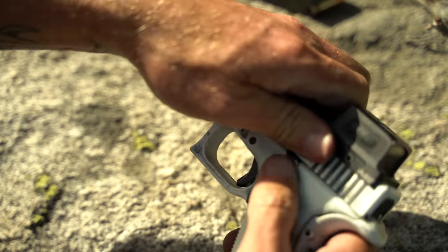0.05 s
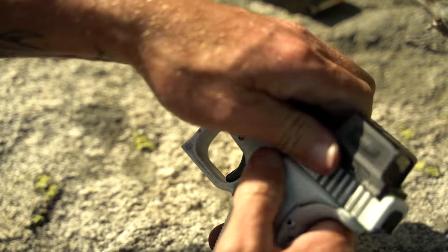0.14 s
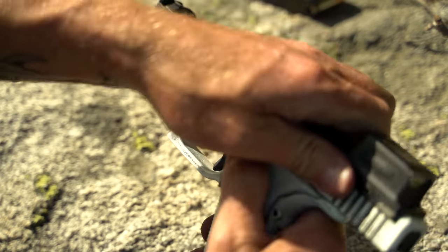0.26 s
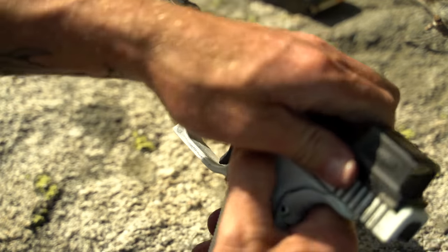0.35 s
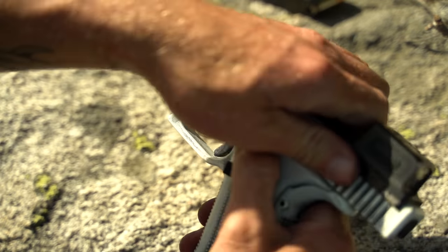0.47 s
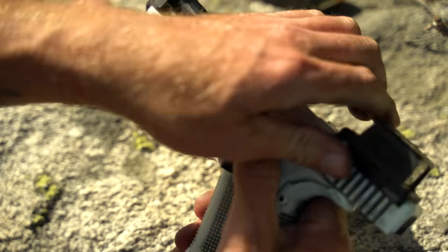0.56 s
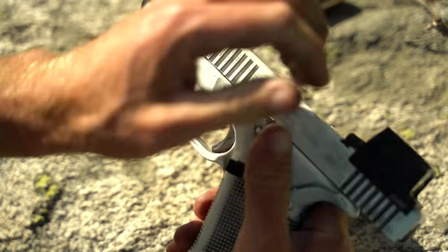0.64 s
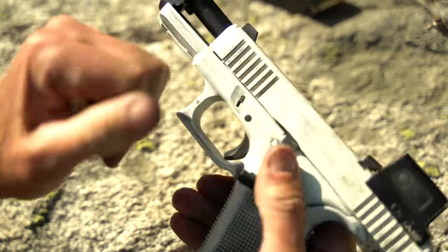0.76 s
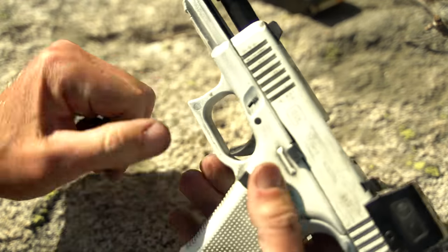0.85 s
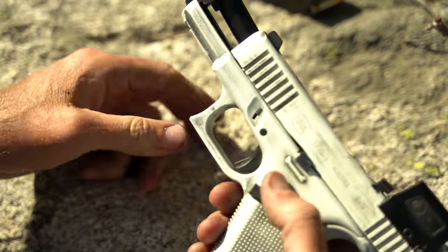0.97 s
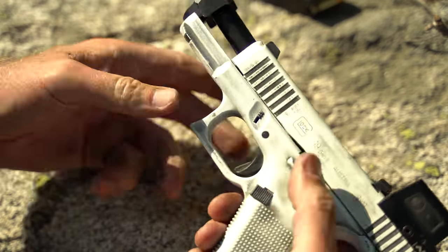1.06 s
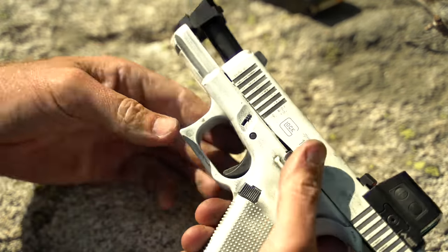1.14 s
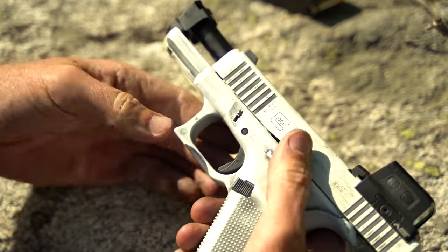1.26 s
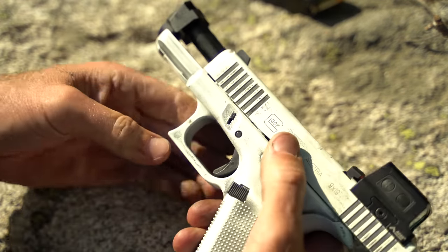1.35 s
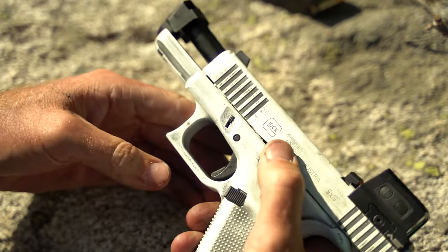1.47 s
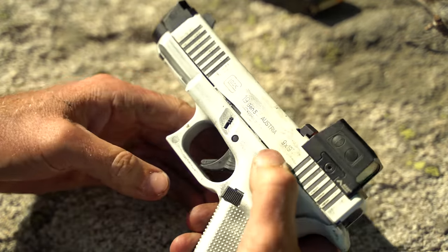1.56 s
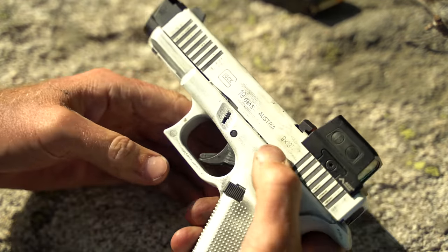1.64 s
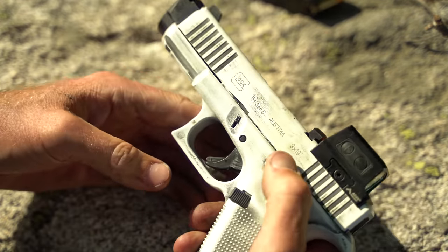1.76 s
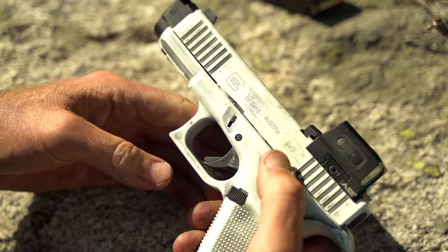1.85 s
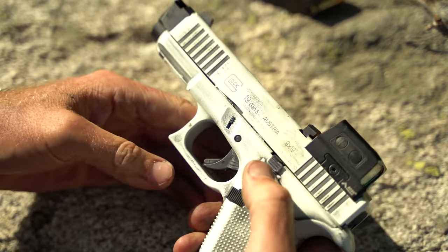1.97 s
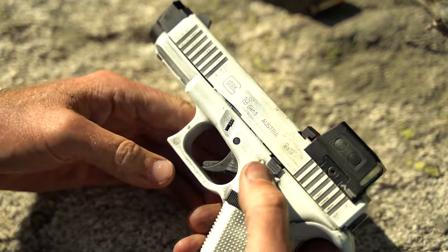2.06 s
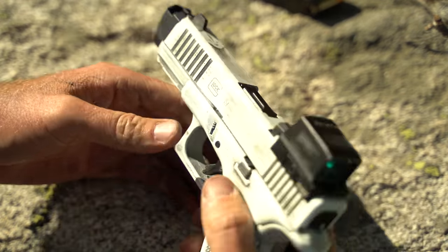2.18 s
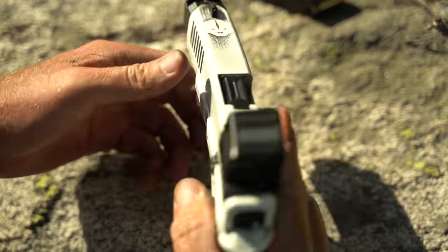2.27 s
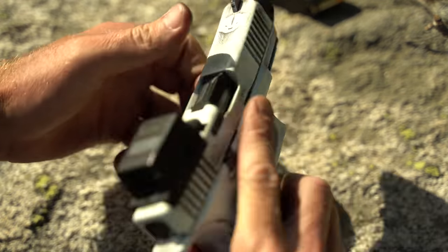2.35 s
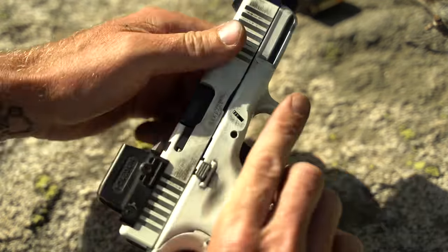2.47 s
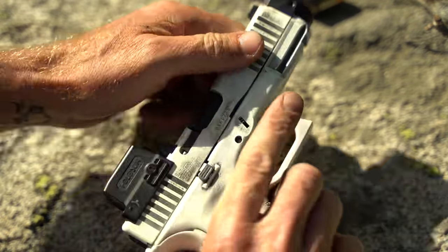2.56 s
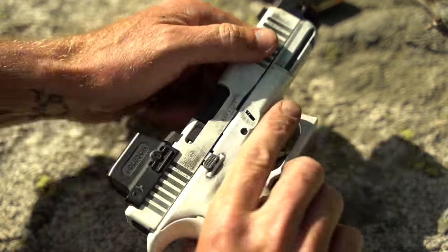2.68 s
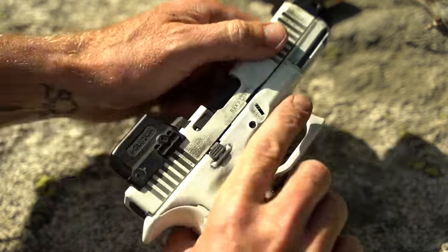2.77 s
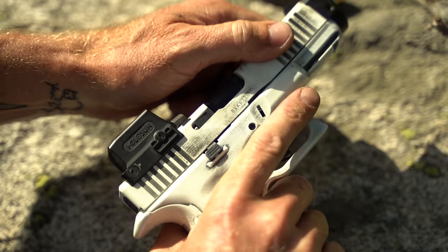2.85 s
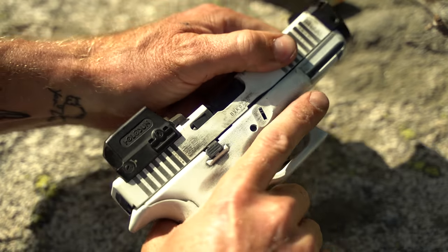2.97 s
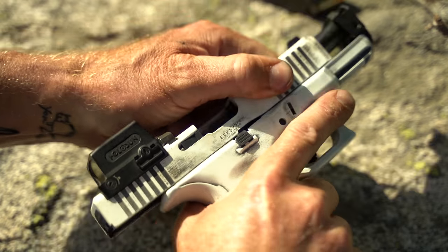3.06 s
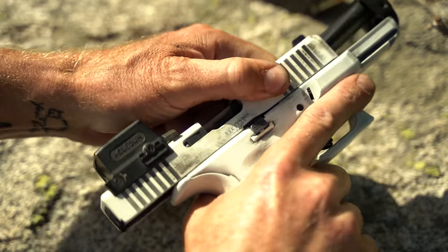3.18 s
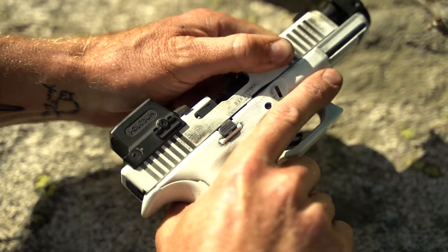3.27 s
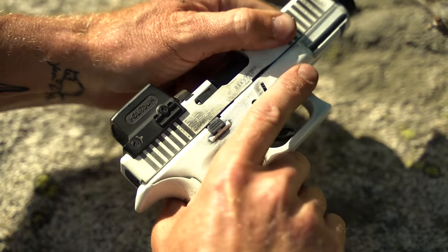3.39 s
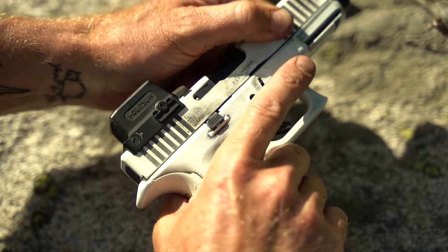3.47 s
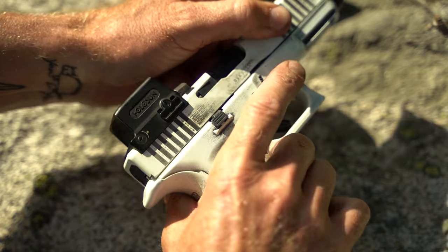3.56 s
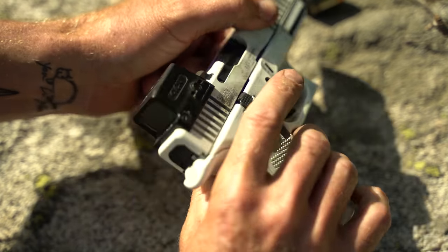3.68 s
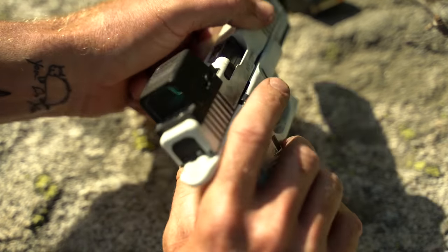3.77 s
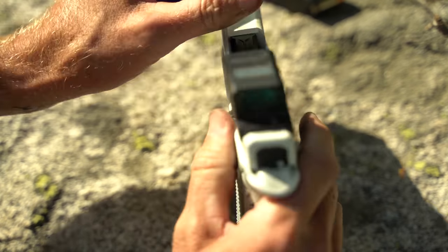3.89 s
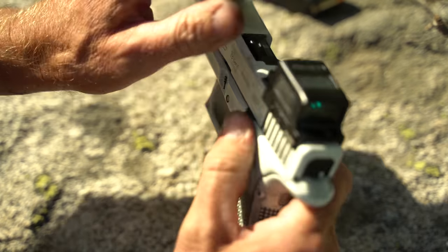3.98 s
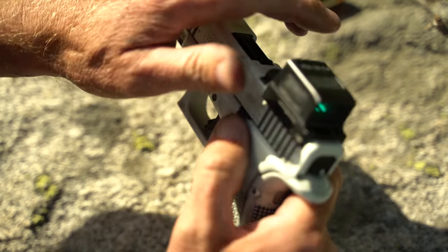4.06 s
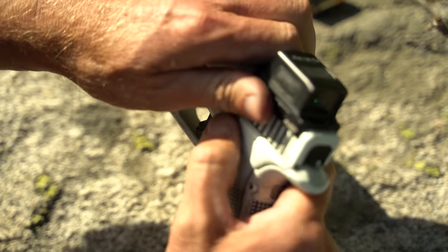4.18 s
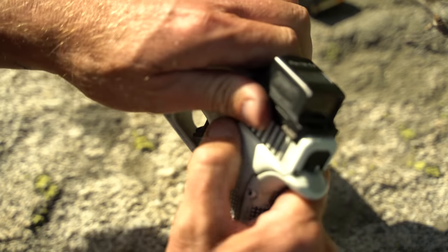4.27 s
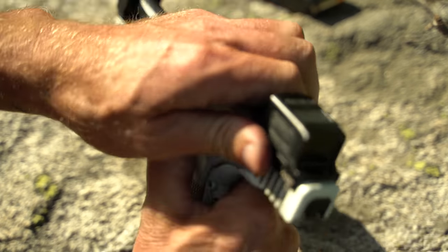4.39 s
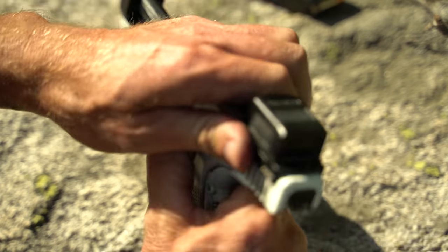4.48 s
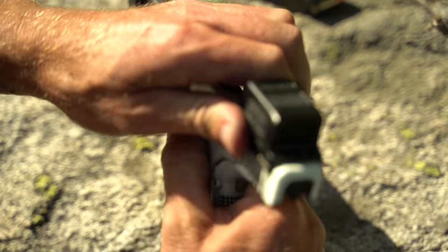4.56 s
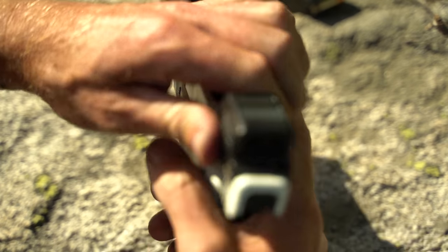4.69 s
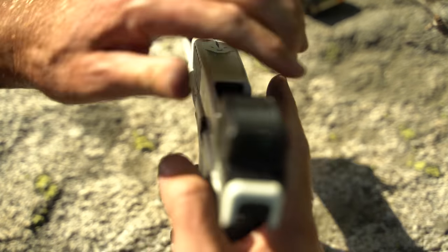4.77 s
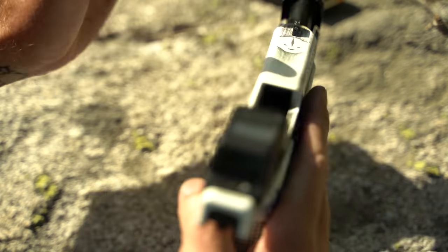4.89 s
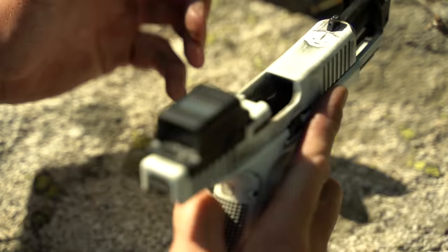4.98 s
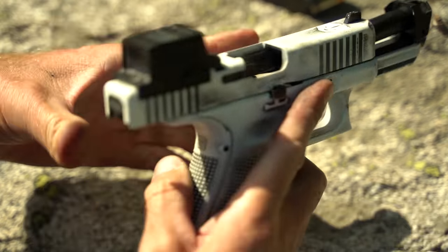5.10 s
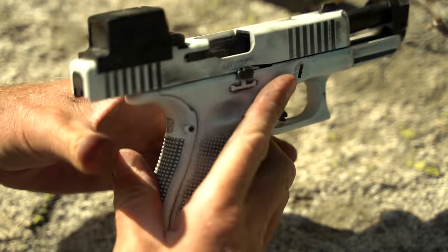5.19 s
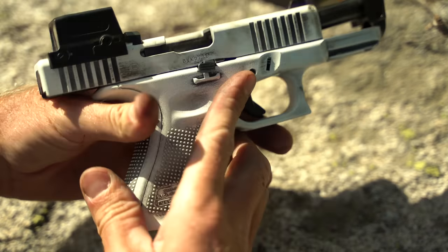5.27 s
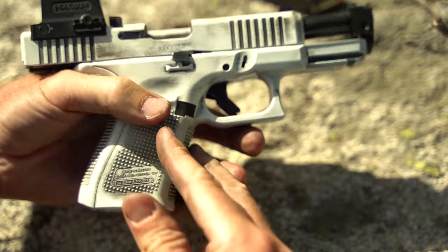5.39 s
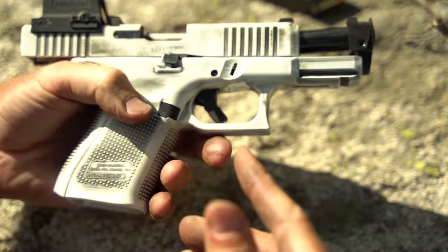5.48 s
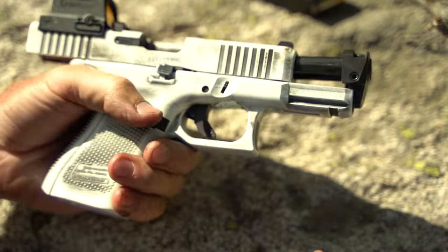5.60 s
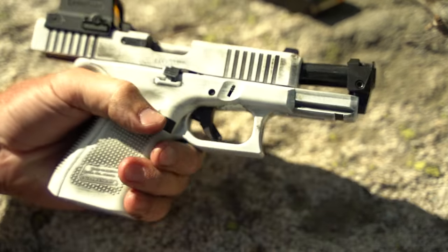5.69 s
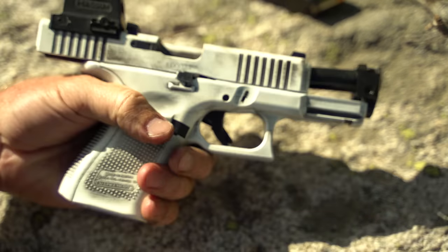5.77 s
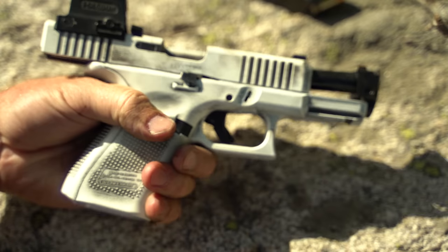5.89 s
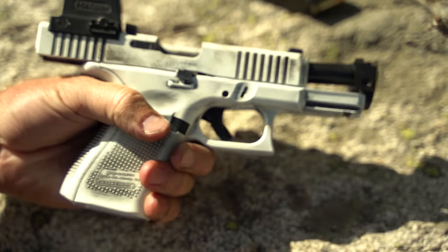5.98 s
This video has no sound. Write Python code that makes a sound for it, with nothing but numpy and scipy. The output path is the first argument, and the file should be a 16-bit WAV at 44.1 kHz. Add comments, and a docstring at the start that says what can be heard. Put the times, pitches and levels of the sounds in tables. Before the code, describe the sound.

A pistol is put back together by hand, close to the microphone outdoors. The steel slide scrapes briefly and clacks twice, then slams shut with one sharp, ringing snap. Two more quick pairs of scrapes and clacks follow, with soft rubbing of palms on the gun between them. A few small ticks finish it, over quiet air and a very faint distant hum.

```python
"""A pistol is put back together and racked by hand, close up, above a flat rock outdoors.
Its steel slide sticks and slips along the rails, knocks against its stops and once slams shut on its
spring. Each stop rings the steel and jolts the hands; lugs, catches and levers click into place.
Palms slip over the metal between strokes, and rock, ground and body throw back a short tail.
The air is quiet, with a faint far hum rising towards the end."""
import sys
import numpy as np
from scipy import signal
from scipy.io import wavfile

SR = 44100
rng = np.random.default_rng(int(sys.argv[2]) if len(sys.argv) > 2 else 0)


def pcm_store(signal):
    """Save signal as 16-bit PCM."""
    levels = np.round(np.clip(np.atleast_2d(signal), -1, 1) * 32767)
    wavfile.write(sys.argv[1], SR, levels.astype(np.int16).T)


N = 266364
TIME = np.arange(N) / SR

# Stereo image: (frequency [Hz], left-right correlation [0..1])
LIKENESS = [(60, .85), (130, .7), (300, .92), (700, .95), (1400, .65), (2500, .35), (5000, .25),
            (14000, .1)]
# Where the gun's modes crowd, a row each for thud, knock, clack, crack and top: (low [Hz], high [Hz])
MODE_BANDS = [(235, 780), (780, 1400), (1780, 3000), (3900, 9200), (9200, 15800)]
# The slide hits the end of its travel: (time [s], clack [dB], frame re clack [dB], crack re clack [dB],
# frame mode [Hz], slide mode [Hz], jolt [dB], rebound delay [s], rebound loss [dB])
SLIDE_STOPS = [(0.3108, -29.5, -3.5, -12.5, 648, 2190, -41, 0.034, 17),
               (0.4924, -19, -4.5, -11, 813, 2597, -49.5, .0225, 18),
               (1.6437, -11, -7.5, 3.5, 1085, 2367, -31, .025, 31),
               (3.2064, -29, 4.5, -4, 1240, 2570, -45, 0.046, 25.5),
               (3.4065, -24.5, -4, 4.5, 1177, 2500, -56, 0.015, 0.5),
               (4.5149, -21, -6, -9, 684, 1886, -39.5, .028, 16.5),
               (4.626, -22.5, -5, -6, 665, 1875, -48, 0.016, 15.5)]


def from_db(db):
    """Decibels to gain."""
    return 10 ** (np.asarray(db) / 20)


def rms_one(x):
    """Scale to unit rms."""
    return x / np.sqrt(np.mean(x ** 2) + 1e-30)


def decay(t, t60):
    """A fade that loses 60 dB in t60 seconds."""
    return np.exp(-np.log(1000) * t / t60)


def at_hz(points, hz):
    """Read a curve on a log-frequency axis."""
    f, value = np.transpose(points)
    return np.interp(np.log(hz), np.log(f), value)


def add(track, sound, s):
    """Mix a stereo sound into the track at s seconds."""
    start = int(s * SR)
    track[:, start:start + sound.shape[1]] += sound[:, :N - start]


def band(x, low, high, order=3):
    """Causal band-pass."""
    sos = signal.butter(order, [low, min(high, .45 * SR)], "band", fs=SR, output="sos")
    return signal.sosfilt(sos, x)


def resonance(x, hz, width_hz):
    """Two-pole resonance with unit gain at its peak."""
    r = np.exp(-np.pi * width_hz / SR)
    feedback = [1, -2 * r * np.cos(2 * np.pi * hz / SR), r * r]
    return signal.lfilter(np.array([1, 0, -1]) * (1 - r * r) / 2, feedback, x)


def stereo_noise(hz, size):
    """White noise with the stereo width and balance that belong to this pitch."""
    # Pan by pitch: (frequency [Hz], left minus right [dB])
    balance = [(50, 4.5), (130, 5.5), (260, 1.7), (550, -1.3), (1100, -2.6), (2300, -.8), (5000, 2.3),
               (12000, .3)]
    mid, side = rng.standard_normal((2, size))
    alike, sides = at_hz(LIKENESS, hz), np.array([[1], [-1]])
    pair = np.sqrt(1 + alike) * mid + np.sqrt(1 - alike) * side * sides
    return pair * from_db(sides * at_hz(balance, hz) / 2)


def drift(per_s):
    """A random wander of unit rms, with per_s new values a second."""
    knots = rng.standard_normal(int(per_s * N / SR) + 2)
    return rms_one(np.interp(TIME * per_s, np.arange(len(knots)), knots))


def coloured(spectrum, drive=1):
    """Stereo noise, shaped in time by a drive, then coloured in half-octave bands; unit rms."""
    edges = np.geomspace(18, 17000, 21)
    centres = np.sqrt(edges[:-1] * edges[1:])
    return rms_one(sum(from_db(at_hz(spectrum, hz)) * band(stereo_noise(hz, N) * drive, low, high, 2)
                       for low, high, hz in zip(edges, edges[1:], centres)))


def outdoor_air(level_db=-64, sway_db=2.76, sways_per_s=2.8):
    """A quiet bed of gently swaying air."""
    # Colour of the air: (frequency [Hz], spectral density [dB])
    air_colour = [(12, -33), (20, 0.5), (49, -2.5), (85, -3), (119, -10.5), (268, -12.5), (386, -8),
                  (469, -14.5), (713, -13.5), (1280, -23.5), (1510, -32), (1650, -25), (4140, -34),
                  (6290, -34), (15800, -39)]
    return from_db(level_db - sway_db * drift(sways_per_s)) * coloured(air_colour)


def swell(s, db, length_s, taper=4.6):
    """Gain of a hand movement that gathers speed, peaks at s seconds and slows again."""
    return from_db(db) / (1 + ((TIME - s) / length_s) ** 2) ** taper


def skin_slips(hold_db=-84.5, rough_db=1.44, grains_per_s=260):
    """Dry skin slides over grip and serrations, barely heard while the gun is only held."""
    # The hands change grip: (time of greatest speed [s], level [dB], length [s])
    regrips = [(0.132, -76, 0.41), (0.9, -66, 0.094), (1.089, -73.5, 0.18), (2.586, -62.5, 0.19),
               (3.675, -72, .09), (3.86, -73.5, .1), (4.19, -59, 0.16), (4.702, -66, .1),
               (4.934, -59.5, 0.18), (5.123, -63, 0.11), (5.43, -68, .18), (5.68, -71, 0.16)]
    # Colour of slipping skin: (frequency [Hz], spectral density [dB])
    skin_colour = [(300, -2), (1000, 3.5), (2200, 2), (3400, -10.5), (5000, -2), (7500, -6), (11000, -7.5),
                   (15500, -18)]
    slipping = from_db(hold_db) + sum(swell(*regrip) for regrip in regrips)
    grain = from_db(rough_db * drift(grains_per_s))
    return slipping * coloured(skin_colour, grain)


def steel_ring(level_db=-1):
    """The steel's bright modes ring on after a blow, each with a random phase on either side."""
    # Modes of the steel parts: (frequency [Hz], relative level [dB], t60 [s])
    steel_modes = [(1920, -21, 0.078), (2700, -23.5, .05), (4100, -27, .1), (4767, -21.5, 0.072),
                   (5500, -9, 0.063), (6140, -33, 0.18), (7537, -8.5, 0.011), (11810, -28, .07)]
    t = TIME[:SR // 5]
    phases = rng.standard_normal((len(steel_modes), 2, 1))
    return sum(from_db(db + level_db) * decay(t, t60) * np.sin(2 * np.pi * hz * t + phase)
               for (hz, db, t60), phase in zip(steel_modes, phases))


def contact(levels_db, frame_hz, slide_hz, t60, onset_s=.0012, dwell_s=.0011, again_db=-8.5):
    """The body of a blow: crowded, hand-damped modes, with a frame and a slide mode standing out."""
    t = TIME[:SR // 10]
    again_s = .0025 * rng.uniform(.9, 1.1)

    def envelope(decay_s):
        """The first touch fades, and a quieter copy of it follows a few milliseconds later."""
        first = (1 - np.exp(-t / onset_s)) * decay(np.maximum(t - dwell_s, 0), decay_s)
        return np.hypot(first, from_db(again_db) * np.interp(t - again_s, t, first, left=0))

    out = 0
    for part, (low, high), db in zip(("thud", "knock", "clack", "crack", "top"), MODE_BANDS, levels_db):
        crowd = stereo_noise(np.sqrt(low * high), len(t)) * envelope(t60)
        if part == "thud":
            crowd = np.diff(crowd, prepend=0)   # so small a body radiates its bass poorly
        if part == "clack":
            high = max(1.314 * slide_hz, low * 1.2)   # a palm that lowers the ring damps the modes above
            db -= .088 * np.clip(-25 - db, 0, 30)   # light touches wake less of the crowd
        if part == "top":
            crowd = signal.lfilter([1, 2, 1], [1], crowd)   # the top rolls away
        out = out + from_db(db) * rms_one(band(crowd, low, high))
    thud_db, knock_db, clack_db = levels_db[:3]
    frame_db = thud_db if frame_hz < MODE_BANDS[0][1] else knock_db
    for hz, db in [(frame_hz, frame_db - 3), (slide_hz, clack_db - 4.5)]:
        # the wider the image at this pitch, the further apart the left and right phases
        phases = np.arccos(at_hz(LIKENESS, hz)) * rng.choice([-1, 1]) * np.array([[.5], [-.5]])
        mode = envelope(1.1 * t60) * np.sin(2 * np.pi * hz * t + phases)
        out = out + from_db(db) * rms_one(mode)
    return out / np.sqrt(10)   # a level is the blow's energy spread over a hundredth of a second


def blow(s, clack_db, frame_db, crack_db, frame_hz, slide_hz, held_t60=.02, free_t60=.024):
    """One hit: the frame gives thud and knock, the slide the clack, hard steel edges crack and top."""
    # No palm damps the slide: (start [s], end [s])
    slide_free = [(.7, 2.4), (5.0, 6.1)]
    t60 = free_t60 if any(start < s < end for start, end in slide_free) else held_t60
    centres = np.sqrt(np.prod(MODE_BANDS[:2], axis=1))
    # the frame's modes weaken by 6.5 dB an octave away from the one struck
    thud_db, knock_db = frame_db - 6.5 * np.abs(np.log2(centres / frame_hz))
    # a palm that pulls the slide's ring below its usual 2200 Hz also dulls the top
    top_db = crack_db - 8 + 15 * np.log2(slide_hz / 2200)
    levels_db = clack_db + np.array([thud_db, knock_db, 0, crack_db, top_db])
    out = from_db(clack_db + crack_db) * steel_ring()
    add(out, contact(levels_db, frame_hz, slide_hz, t60), 0)
    return out


def clicks_and_stops():
    """Small parts click home; the slide hits its stops and rebounds once from each."""
    # Barrel lugs, catches and levers: (time [s], clack [dB], frame re clack [dB], crack re clack [dB],
    # frame mode [Hz], slide mode [Hz])
    clicks = [(0.2399, -23.5, -10, -4.5, 1096, 2856), (0.273, -28, -9, -7.5, 1200, 2500),
              (0.2974, -28.5, -14, -16, 1180, 2080), (0.952, -49, -4.5, -15, 1100, 2150),
              (1.203, -62, -7.5, -6.5, 477, 2750), (1.273, -68.5, 7, -12, 1067, 1960),
              (1.6247, -20.5, -2.5, -1.5, 1293, 2290), (1.641, -26, -7, -0.5, 1015, 2580),
              (2.2014, -65, 6, -2.5, 707, 2620), (3.084, -50, -3.5, -10, 1250, 2300),
              (3.1019, -51, -6, -4, 1147, 2246), (3.113, -40.5, -1.5, -5, 1288, 2370),
              (3.123, -38.5, 3, 2.5, 1100, 2620), (3.187, -42.5, -1, 7, 1010, 2000),
              (3.298, -56.5, 1, -19, 1033, 2680), (3.3116, -56.5, 2.5, -15, 1026, 2630),
              (3.3539, -45, -4, 0.5, 1000, 2400), (3.3765, -42, -0.5, -8, 1320, 2514),
              (3.4017, -38.5, -18, -3, 1080, 2400), (3.484, -62.5, 8.5, -7, 1350, 1890),
              (4.4393, -41.5, -13, -3.5, 1190, 1954), (4.454, -33.5, -13, -1.5, 1320, 2090),
              (4.4585, -27.5, -3.5, -0.5, 1184, 1930), (4.5, -30, -16, -1.5, 894, 2070),
              (5.353, -53, -9.5, -18, 918, 2200), (5.3786, -39.5, -10, -13, 1039, 2162),
              (5.626, -50.5, -7, -16.5, 932, 2075), (5.753, -62.5, 5, -18, 390.7, 2300),
              (5.8419, -51.5, 12, 0, 380, 1860), (5.955, -64.5, 1, -16.5, 1390, 2260)]
    # A rebound's soft touch rings the slide's lowest mode:
    # (frame re clack [dB], crack re clack [dB], frame mode [Hz], slide mode [Hz])
    rebound_colour = (-10.5, -11.5, 1200.5, 1880)
    out, hits = np.zeros((2, N)), list(clicks)
    for s, clack_db, *colour, _, rebound_s, loss_db in SLIDE_STOPS:
        hits.append((s, clack_db, *colour))
        hits.append((s + rebound_s, clack_db - loss_db, *rebound_colour))
    for s, *strike in hits:
        add(out, blow(s, *strike), s)
    return out


def reflections(gun, wet_db=-26, onset_s=.008, low_t60=.15, high_t60=.097):
    """Rock, ground and body throw back a short diffuse tail, whose treble dies first."""
    t = TIME[:SR // 4]
    tail, edges = 0, np.geomspace(400, 14000, 7)
    for low, high, t60 in zip(edges, edges[1:], np.linspace(low_t60, high_t60, len(edges) - 1)):
        shape = np.clip(t / onset_s, 0, 1) ** 2 * decay(t, t60)
        tail = tail + band(stereo_noise(np.sqrt(low * high), len(t)) * shape, low, high)
    return from_db(wet_db) * signal.fftconvolve(gun, rms_one(tail) / np.sqrt(len(t)), axes=1)[:, :N]


def stroke(start, end, start_db, end_db, rise_db_per_s=949.5, fall_db_per_s=748.5):
    """Gain of one run of the slide: a quick rise, a steady change of speed, a quick fall."""
    fade_db = rise_db_per_s * np.maximum(start - TIME, 0) + fall_db_per_s * np.maximum(TIME - end, 0)
    return from_db(np.interp(TIME, [start, end], [start_db, end_db]) - np.minimum(fade_db, 200))


def rail_scrape(rough_db=3.5, slips_per_s=420, slide_db=-1):
    """Steel sticks and slips along the rails; slide and spring ring with it."""
    # Runs of the slide: (start [s], end [s], friction at start [dB], friction at end [dB])
    strokes = [(0.252, 0.311, -39.5, -30), (0.472, 0.501, -53.5, -34.5), (3.117, 3.216, -48.5, -35.5),
               (3.339, 3.393, -49.5, -34.5), (4.456, 4.528, -39, -29.5), (4.633, 4.646, -31, -34)]
    # Colour of the rail friction: (frequency [Hz], spectral density [dB])
    friction_colour = [(200, -22.5), (500, 0), (1000, 6.5), (1500, 8.5), (2250, 7.5), (3000, 12.5),
                       (4000, -1), (6500, -2), (10000, -10.5), (15000, -22.5)]
    stick_slip = from_db(rough_db * np.clip(drift(slips_per_s), -2, 2))
    friction = sum(stroke(*row) for row in strokes) * coloured(friction_colour, stick_slip)
    slide = from_db(slide_db) * resonance(friction, hz=2200, width_hz=450)
    spring = resonance(friction, hz=6100, width_hz=300)
    return (friction + slide + spring) / (1 + from_db(slide_db))   # unit gain at the slide's resonance


def hand_jolts(usual_db=-48.5):
    """When the slide stops, the hands answer with a slap, a short thump and a fading tremor."""
    # Slap, thump and tremor: (low [Hz], high [Hz], relative level [dB], t60 [s],
    # response to the jolt's strength [dB per dB])
    hand_bands = [(156, 330, -6.5, .03, 1.3), (45.3, 140, 4.5, .035, 1), (23.83, 58, -1.5, .33, .4)]
    t, out = TIME[:SR // 2], np.zeros((2, N))
    for s, *_, jolt_db, _, _ in SLIDE_STOPS:
        for low, high, part_db, t60, response in hand_bands:
            fade = decay(t, t60)
            burst = band(stereo_noise(np.sqrt(low * high), len(t)) * fade, low, high, order=2)
            db = usual_db + response * (jolt_db - usual_db) + part_db
            add(out, from_db(db) * rms_one(burst) * np.sqrt(np.mean(fade ** 2)), s)
    return out


def far_hum(level_db=-75, full_s=5.65, rise_db_per_s=14.5, width_hz=22):
    """A distant hum of narrow, wavering partials fades up and holds."""
    # Partials of the hum: (frequency [Hz], relative level [dB])
    partials = [(200, -3.5), (398, 7), (597, -8.5), (800, -7.5), (995, -10.5), (1185, -2), (1380, -14)]
    hum = 0
    for hz, db in partials:
        partial = resonance(resonance(stereo_noise(hz, N), hz, width_hz), hz, width_hz)
        hum = hum + from_db(db) * rms_one(partial)
    return from_db(level_db - rise_db_per_s * np.maximum(full_s - TIME, 0)) * hum


def finger_brush(slide_hz=2250, width_hz=300, uneven_db=7, changes_per_s=30):
    """Fingers brush the locked-back slide, which sings faintly at its resonance."""
    brushing = swell(s=5.52, db=-72.5, length_s=.33) * from_db(uneven_db * drift(changes_per_s))
    singing = resonance(stereo_noise(slide_hz, N), slide_hz, width_hz)
    return brushing * rms_one(resonance(singing, slide_hz, 2 * width_hz))


def scene():
    """The gun is held a little to the right, so its sound reaches the left side a sample later."""
    gun = clicks_and_stops() + rail_scrape()
    left, right = gun + reflections(gun) + skin_slips() + finger_brush()
    return np.array([np.roll(left, 1), right]) + hand_jolts() + outdoor_air() + far_hum()


def record(dry, cutoff_hz=16000):
    """Peaks beyond full scale clip, and a steep low-pass cuts the top."""
    clipped = np.clip(dry, -1, 1)
    return signal.sosfilt(signal.ellip(8, .2, 70, cutoff_hz, fs=SR, output="sos"), clipped)


dry = scene()
out = record(dry)
pcm_store(out)
```